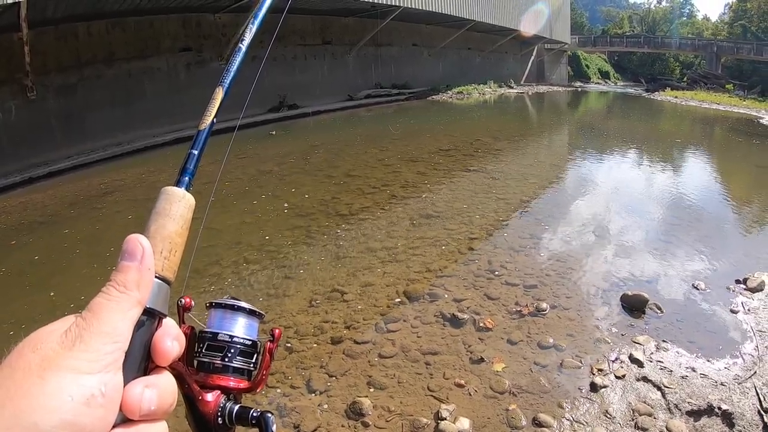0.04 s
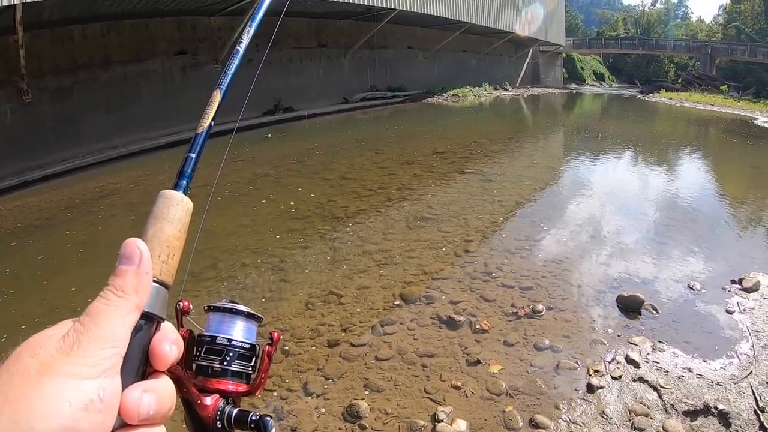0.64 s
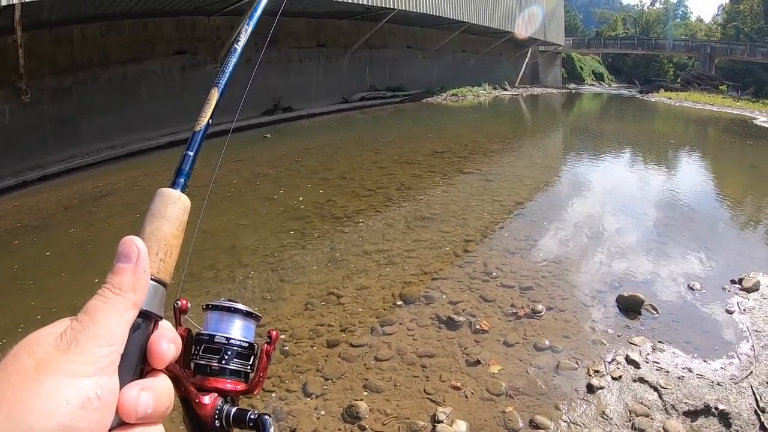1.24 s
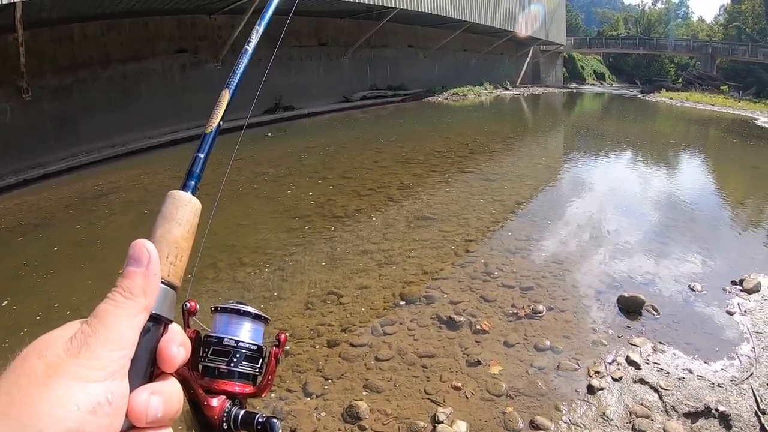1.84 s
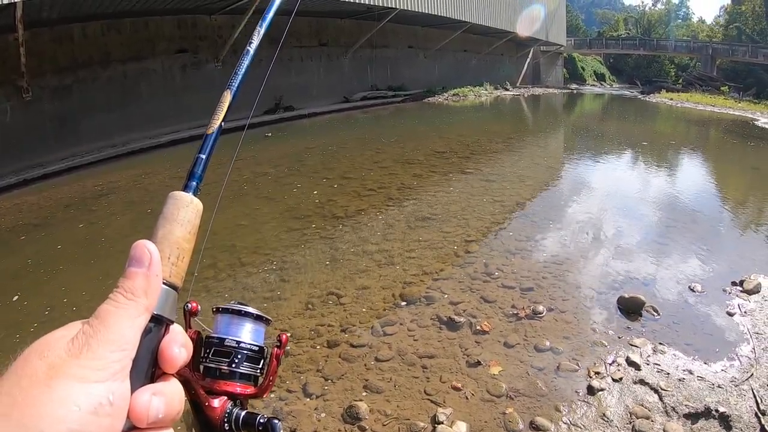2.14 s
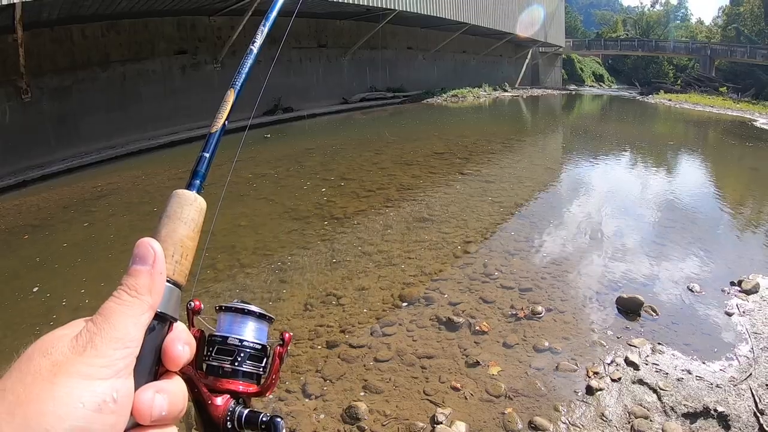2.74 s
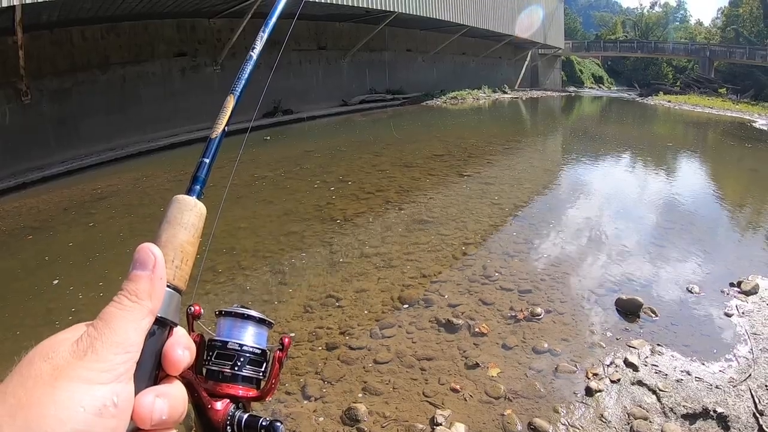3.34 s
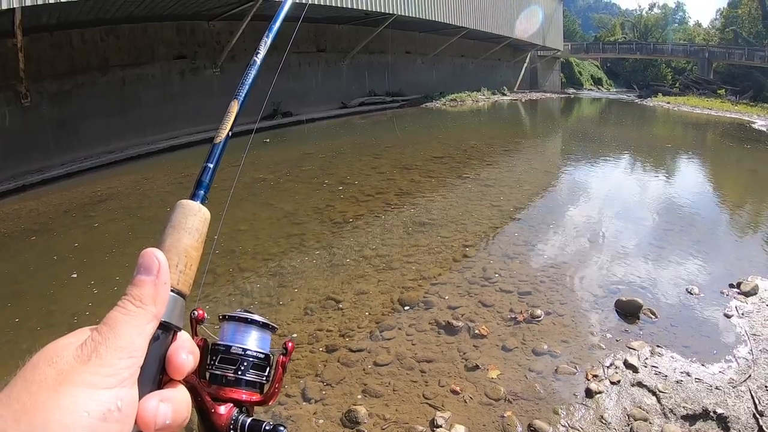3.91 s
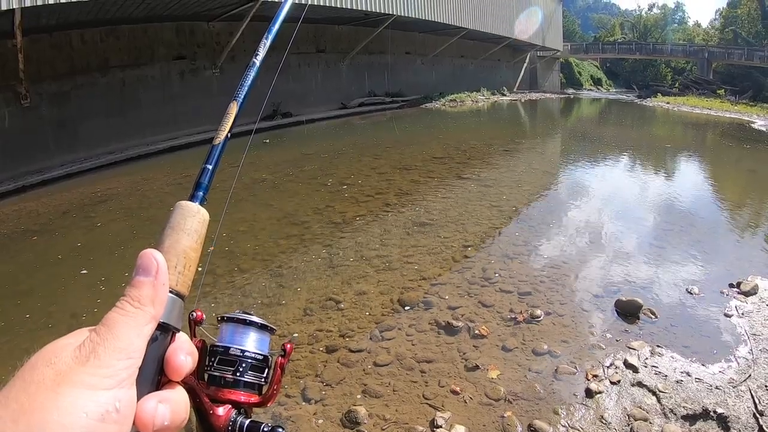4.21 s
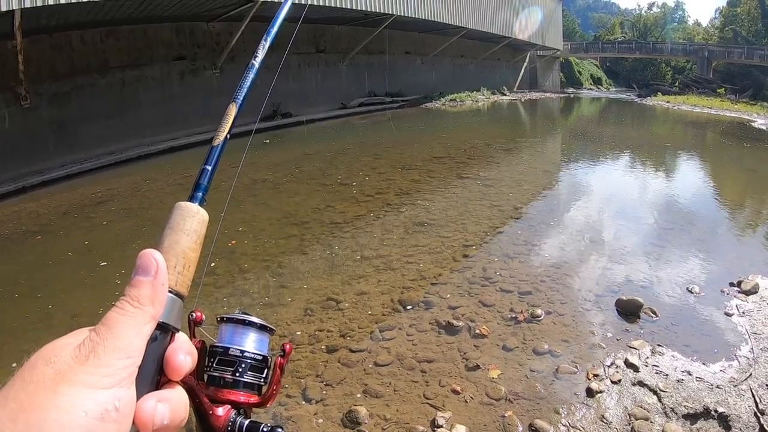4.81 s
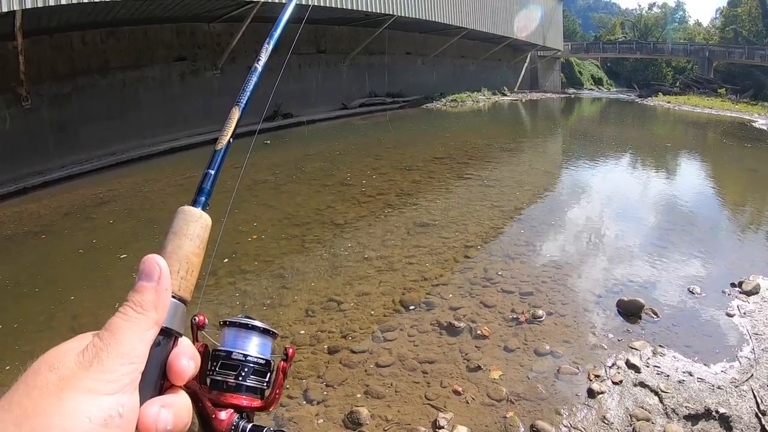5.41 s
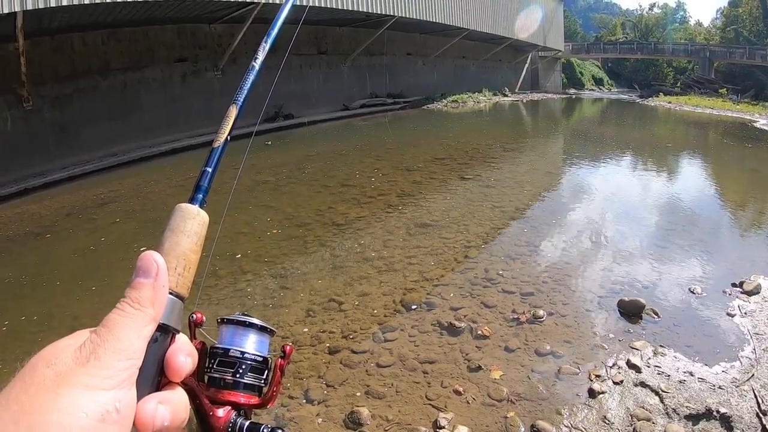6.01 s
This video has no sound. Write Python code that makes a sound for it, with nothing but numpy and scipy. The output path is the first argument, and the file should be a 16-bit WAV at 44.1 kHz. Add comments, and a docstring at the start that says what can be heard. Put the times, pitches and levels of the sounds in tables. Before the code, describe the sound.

A truck's low exhaust throbs on a bridge overhead, with steady traffic rumble and a breeze buffeting the microphone.

```python
"""Truck over a creek bridge

Under a concrete bridge, a heavy truck's exhaust throbs overhead at steady revs, then drops as for a
gear change. A second engine hums further off. Wheels shake the deck and their tyre wash slowly
recedes. A breeze buffets the microphone, and shallow water hisses faintly over stones."""
import sys
import numpy as np
from scipy import signal
from scipy.fft import irfft
from scipy.io import wavfile

SR = 44100
rng = np.random.default_rng(int(sys.argv[2]) if len(sys.argv) > 2 else 0)


def materialize(psi):
    """Save the field psi as 16-bit PCM at rate SR to the path in sys.argv[1].

    A 1-D psi becomes a single channel; in a 2-D psi each row is a channel.
    """
    bounded = np.clip(np.atleast_2d(psi).T, -1, 1)
    quanta = np.round(bounded * 32767).astype(np.int16)
    wavfile.write(sys.argv[1], SR, quanta)


N = 267025
TIME = np.arange(N) / SR
BIN_HZ = np.maximum(np.arange(N // 2 + 1) * SR / N, 1)


def truck(cylinders=8, throbs_per_cycle=3, cruise_hz=103, waver_db=1.84, fading=0.5, pan_db=-0.5):
    """Exhaust drone: a strong firing tone that throbs, since the cylinders do not fire alike."""
    # revs creeping up, then let go: time_s, firing_hz
    revs = [(0, 103.9), (0.85, 104.2), (1.1, 104.6), (1.7, 106), (2.45, 106.4), (3.1, 106.8), (4.2, 106.9),
            (5.25, 107.1), (5.48, 101.2), (5.8, 79.4), (6.05, 76.37)]
    # level ride of the firing tone: time_s, relative_db
    drone = [(0, -39), (0.3, -32), (0.48, -33), (0.76, -30.5), (0.83, -27.5), (1.08, -27), (1.35, -28.5),
             (1.55, -31), (1.85, -31), (2.15, -28.5), (2.44, -27), (2.53, -32), (2.6, -28.5), (2.95, -25.5),
             (3.45, -27.5), (4.3, -28), (5.3, -33), (5.65, -34.5), (5.82, -40.5), (6.05, -28)]
    # level rides of the exhaust's roughness: time_s, flutter_db, rasp_db
    roughness = [(0, -37.5, -57), (0.7, -42, -59), (1.9, -48, -66), (3.6, -48, -64), (4.9, -51, -61),
                 (6.05, -52, -66)]
    # weaker harmonics, the engine's body: multiple of the cycle rate, relative_db
    body = [(3, -13.5), (9, -7.5), (10, -10.5), (12, -13), (13, -10), (14, -19), (15, -23.5), (17, -25.5),
            (18, -24), (19, -24), (20, -26.5), (21, -26)]
    # highest harmonics, the exhaust's rasp: multiple of the cycle rate, relative_db
    rasp = [(23, -2), (24, -1), (26, -3), (31, -7)]
    firing_hz, = in_time(revs)
    drone_db, = in_time(drone)
    flutter_db, rasp_db = in_time(roughness)
    # the throb fades as the truck draws away, and when the revs drop below cruising
    off_load_db = 0.15 * np.maximum(cruise_hz - firing_hz, 0)
    lower_throb = from_db(-34.5 - 0.87 * TIME - off_load_db + waver_db * drift(3.0))
    upper_throb = from_db(-43.5 - 0.55 * TIME - off_load_db + waver_db * drift(8.9))
    upper_throb += from_db(-36.5) * swell(peak_s=0.24, width_s=0.14)  # brief opening flare
    cycle_hz = firing_hz * (1 + 0.0013 * drift(5.0)) / cylinders
    cycle_phase = 2 * np.pi * np.cumsum(cycle_hz) / SR
    exhaust = from_db(drone_db - 0.96 + 1.5 * drift(10)) * np.sin(cylinders * cycle_phase)
    # the throb is a tone on either side of the firing rate, in step with it
    exhaust += lower_throb * np.sin((cylinders - throbs_per_cycle) * cycle_phase)
    exhaust += upper_throb * np.sin((cylinders + throbs_per_cycle) * cycle_phase)
    # one odd cylinder makes the drone flutter once a cycle
    exhaust += from_db(flutter_db + waver_db * drift(2.1)) * np.sin((cylinders - 1) * cycle_phase)
    # the body slowly tilts brighter: its low harmonics sink while its top ones rise
    body_db = -36.5 - 1.15 * TIME
    partials = [(multiple, body_db + db + 0.08 * multiple * TIME) for multiple, db in body]
    partials += [(multiple, rasp_db + db) for multiple, db in rasp]
    for multiple, level_db in partials:
        # shifting reflections from deck and banks make each harmonic fade on its own
        reflections = fading * (drift(2.6) + 1j * drift(2.6))
        paths = (1 + reflections) / np.sqrt(1 + 2 * fading ** 2)
        phase = multiple * cycle_phase + rng.uniform(0, 2 * np.pi)
        exhaust += from_db(level_db) * np.real(paths * np.exp(1j * phase))
    return np.sqrt(2) * exhaust * from_db([[pan_db], [-pan_db]])


def far_engine(firing_hz=81.4, wander_hz=0.46, peak_rms_db=-40.5):
    """A second engine hums as it comes and goes, beating against the truck."""
    phase = 2 * np.pi * np.cumsum(firing_hz + wander_hz * drift(1.9)) / SR
    return np.sqrt(2) * from_db(peak_rms_db) * swell(peak_s=2.93, width_s=1.4) * np.sin(phase)


def breeze(lull_db=-56.5, lumpy_db=2.0, bright_above_db=-33, boost_db=5.0):
    """Gusts swell out of a lull as lumpy turbulence at each microphone; stronger means brighter."""
    # gusts on the microphone: peak_s, strength_db, length_s
    gusts = [(0.245, -40, 0.17), (0.87, -35, 0.078), (1.173, -36, 0.046), (1.391, -31.5, 0.19),
             (2.109, -35.5, 0.064), (2.569, -35.5, 0.22), (2.93, -38, 0.19), (3.17, -40, 0.063),
             (3.75, -47, 0.25), (4.4, -42.5, 0.16), (4.722, -40.5, 0.08), (5.077, -38, 0.37),
             (5.62, -32.5, 0.13), (5.87, -46, 0.14)]
    # low rumble of slow eddies: frequency_hz, relative_db
    eddies = [(10, -23.5), (22, -1), (38, -0.5), (70, -6), (110, -16), (160, -25), (230, -34), (400, -52.5),
              (1500, -80)]
    # fine turbulence of the stronger gusts: frequency_hz, relative_db
    turbulence = [(20, -14.5), (60, 9.5), (110, 0.5), (170, -8), (250, -23), (400, -33), (700, -43),
                  (1500, -69.5)]
    gusting = sum(from_db(db) * swell(peak_s, length_s / 2) for peak_s, db, length_s in gusts)
    strength_db = 20 * np.log10(from_db(lull_db) + gusting)
    channels = []
    for _ in range(2):
        local_db = strength_db + lumpy_db * drift(25)
        fine = from_db(-6 + 0.9 * (local_db - bright_above_db)) * noise(turbulence)
        channels.append(from_db(local_db + boost_db) * (noise(eddies) + fine))
    return np.array(channels)


def buffets(trim_db=-1):
    """An eddy thumps one microphone: a brief push of pressure with suction on either side."""
    # single eddies: peak_s, relative_db, width_s, channel (0 left, 1 right)
    hits = [(0.817, -15.5, 0.0028, 1), (0.886, -14.5, 0.0047, 1), (1.368, -17.5, 0.0012, 1),
            (1.425, -27, 0.0034, 1), (2.085, -29, 0.002, 0), (2.865, -12, 0.0027, 1),
            (3.165, -22, 0.0046, 1), (4.471, -21, 0.0048, 1), (4.65, -23, 0.004, 1),
            (5.13, -15.5, 0.0045, 0), (5.569, -21, 0.0037, 0), (5.618, -15, 0.005, 1),
            (5.809, -24, 0.01, 0)]
    thumps = np.zeros((2, N))
    for peak_s, level_db, width_s, channel in hits:
        offset = (TIME - peak_s) / width_s
        thumps[int(channel)] += from_db(level_db + trim_db) * (1 - offset ** 2) * swell(peak_s, width_s)
    return thumps


def deck_rumble(steady_db=-43, surge_db=-42.5, decay_s=0.6, pan_db=0.6):
    """Wheels shake the deck, hardest at the start; its long waves reach both microphones in phase."""
    # colour of the rumble: frequency_hz, relative_db
    colour = [(10, -22), (25, 0), (45, 1.5), (75, 1.5), (125, -1.5), (170, -5), (210, -9.5), (300, -13),
              (400, -17), (600, -23), (1200, -61.5)]
    shaking = from_db(steady_db) + from_db(surge_db) * np.exp(-TIME / decay_s)
    return shaking * noise(colour) * from_db([[pan_db], [-pan_db]])


def tyre_wash(start_db=-50, fall_db_per_s=0.2948, waver_db=0.27):
    """Tyres roar along the bridge and swell as vehicles pass, leaning left where a wall reflects them."""
    # colour of the receding roar: frequency_hz, relative_db
    roar_colour = [(200, -12), (450, -2), (650, 1.5), (900, 1), (1250, 1.5), (1600, -2), (2700, -5.5),
                   (3200, -7), (3700, -11), (4500, -16.5), (5500, -30.5), (9000, -40)]
    # vehicles close overhead: peak_s, peak_db, width_s
    near_passes = [(0.25, -48.5, 0.23), (1.1, -57, 0.7), (2.4, -57, 0.25), (2.85, -61, 0.12)]
    # colour of their tyres: frequency_hz, relative_db
    near_colour = [(200, 1.5), (500, -2.5), (900, 6.5), (1300, -8), (2000, -2.5), (2900, -2), (3800, -14),
                   (5300, -19), (7400, -20), (9300, -24), (11000, -41)]
    # vehicles in the far lanes: peak_s, peak_db, width_s
    far_passes = [(0.25, -54.5, 0.13), (0.68, -55.5, 0.14), (1.45, -58.5, 0.23), (2.78, -54, 0.055),
                  (3.95, -56.5, 0.09), (4.32, -56.5, 0.09), (5.12, -54.5, 0.18), (6.0, -58, 0.09)]
    # colour of their tyres, dulled by the deck: frequency_hz, relative_db
    far_colour = [(150, -15.5), (330, -2), (550, -3), (900, -0.5), (1300, -13.5), (2500, -23), (5000, -45)]
    # stereo image of all the tyres: frequency_hz, coherence (0-1), left_lead_rad, left_over_right_db
    image = [(60, .99, 0, -.5), (250, .96, .05, -.5), (440, .78, .15, .3), (700, .58, .55, 3.3),
             (1020, .64, 1.15, 5.5), (1280, .26, 2.6, 5.5), (1500, .22, 4.6, 5.5), (2000, .45, 5.5, 5),
             (2650, .58, 6.25, 4.8), (3200, .43, 6.5, 3.7), (4200, .65, 6.8, 1), (5500, .4, 8, 0)]
    roar_db = start_db - fall_db_per_s * TIME + waver_db * drift(1.5)
    roar = from_db(roar_db) * wide_noise(roar_colour, image)
    near = passing(near_passes) * wide_noise(near_colour, image)
    far = passing(far_passes) * wide_noise(far_colour, image)
    return roar + near + far


def creek(start_db=-63.5, fall_db_per_s=0.2, ripple_db=0.9):
    """Shallow water runs over stones with a faint, flickering hiss."""
    # colour of the hiss: frequency_hz, relative_db
    colour = [(1500, -1.5), (3500, -5), (4500, 0.5), (5300, -1.5), (7300, 0), (8400, -5.5), (9400, -4.5),
              (10000, -14.5), (11000, -21.5)]
    # its wide stereo image: frequency_hz, coherence (0-1), left_lead_rad, left_over_right_db
    image = [(4000, 0.29, 5.9, 0.0055), (5230, 0.15, 9, 0), (7200, 0.35, 10.1, -1), (9500, 0.16, 10.5, 1.5)]
    level_db = start_db - fall_db_per_s * TIME + ripple_db * drift(15)
    return from_db(level_db) * wide_noise(colour, image)


def passing(vehicles):
    """Each vehicle swells and fades with its distance; their powers add."""
    powers = (from_db(db) ** 2 / (1 + ((TIME - peak_s) / width_s) ** 2)
              for peak_s, db, width_s in vehicles)
    return np.sqrt(sum(powers))


def swell(peak_s, width_s):
    """Bell-shaped rise and fall of height 1."""
    return np.exp(-((TIME - peak_s) / width_s) ** 2 / 2)


def drift(rate_hz):
    """Random wander, mostly slower than rate_hz, rms 1."""
    return rms_one(irfft(white_spectrum() / (1 + (BIN_HZ / rate_hz) ** 2), N))


def noise(colour):
    """Mono noise of a given colour, rms 1."""
    return rms_one(irfft(white_spectrum() * from_db(in_frequency(colour)[0]), N))


def wide_noise(colour, image):
    """Stereo noise, rms 1: a direct part reaches both microphones, a diffuse part differs in each."""
    coherence, lead_rad, balance_db = in_frequency(image)
    left = white_spectrum()
    direct = coherence * left * np.exp(-1j * lead_rad)
    right = direct + np.sqrt(1 - coherence ** 2) * white_spectrum()
    pair = np.array([left * from_db(balance_db / 2), right * from_db(-balance_db / 2)])
    return rms_one(irfft(pair * from_db(in_frequency(colour)[0]), N))


def white_spectrum():
    """Spectrum of fresh white noise."""
    return rng.standard_normal(len(BIN_HZ)) + 1j * rng.standard_normal(len(BIN_HZ))


def in_time(rows):
    """Each column of an automation curve at every sample."""
    time_s, *columns = np.transpose(rows)
    return [np.interp(TIME, time_s, column) for column in columns]


def in_frequency(rows):
    """Each column of a spectrum at every frequency bin."""
    frequency_hz, *columns = np.transpose(rows)
    return [np.interp(np.log(BIN_HZ), np.log(frequency_hz), column) for column in columns]


def from_db(db):
    """Decibels to gain."""
    return 10 ** (np.asarray(db) / 20)


def rms_one(x):
    """Scale to unit rms."""
    return x / np.sqrt(np.mean(x ** 2))


def scene():
    """Road above, creek below, wind at the microphone."""
    return truck() + far_engine() + deck_rumble() + tyre_wash() + creek() + breeze() + buffets()


def record(dry):
    """A steep low-pass takes off the top."""
    cutoff_hz = 10600
    return signal.sosfilt(signal.ellip(10, .1, 80, cutoff_hz, fs=SR, output="sos"), dry)


dry = scene()
out = record(dry)
materialize(out)
```